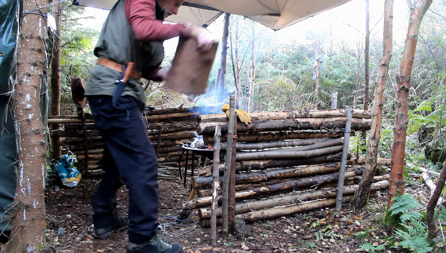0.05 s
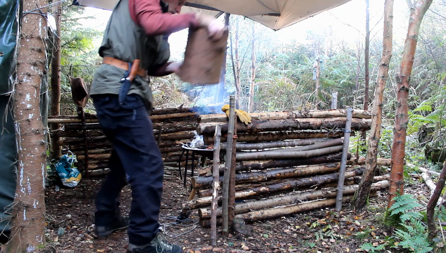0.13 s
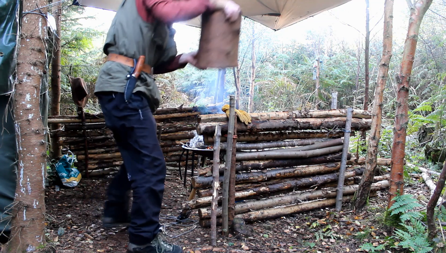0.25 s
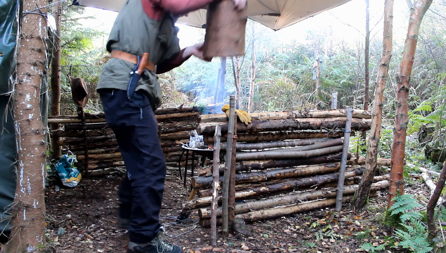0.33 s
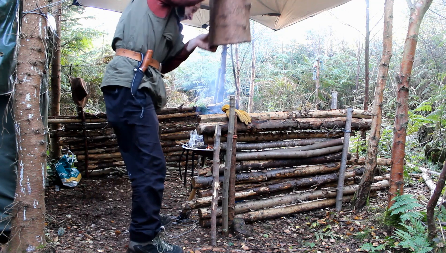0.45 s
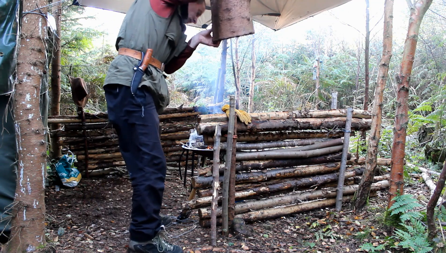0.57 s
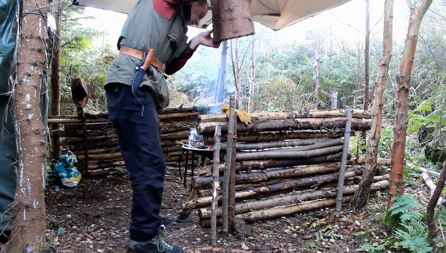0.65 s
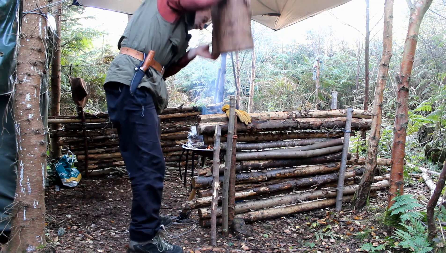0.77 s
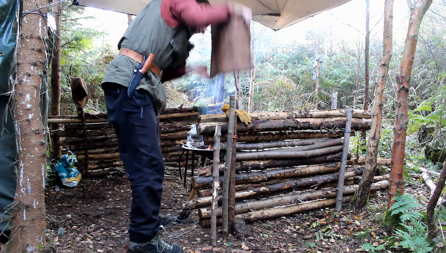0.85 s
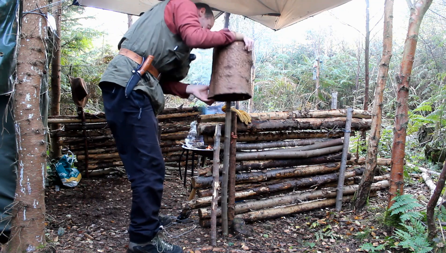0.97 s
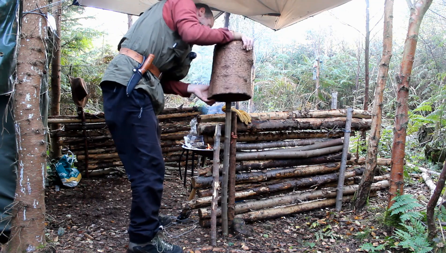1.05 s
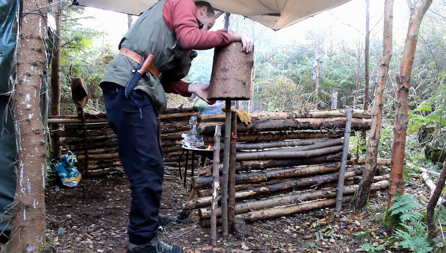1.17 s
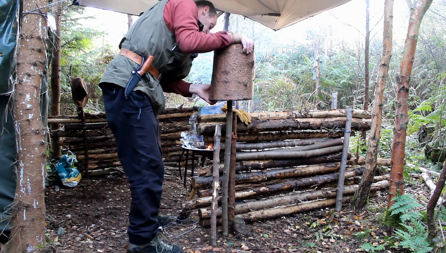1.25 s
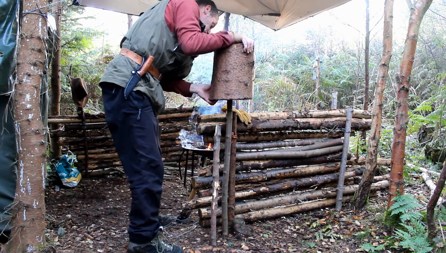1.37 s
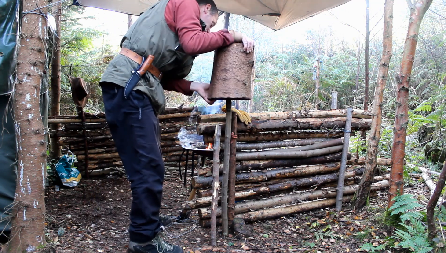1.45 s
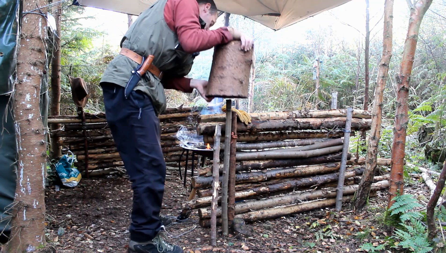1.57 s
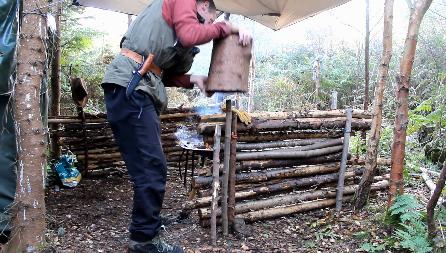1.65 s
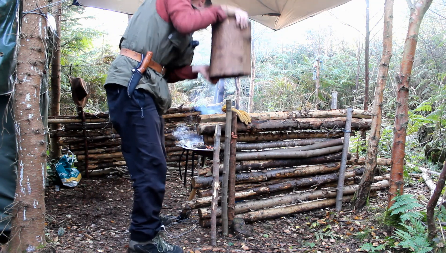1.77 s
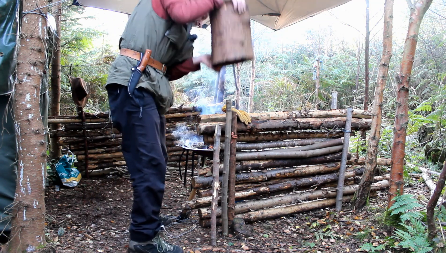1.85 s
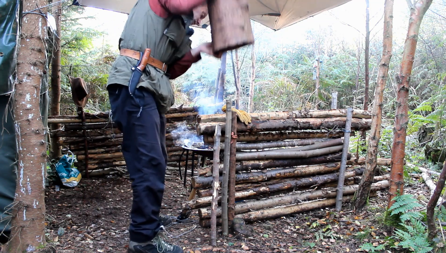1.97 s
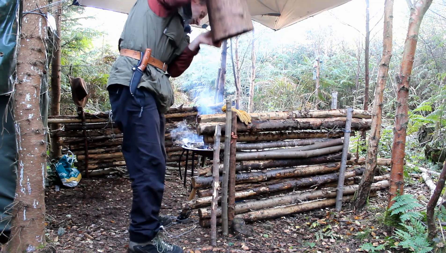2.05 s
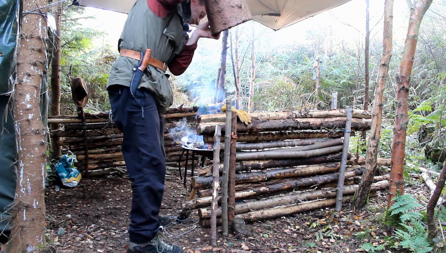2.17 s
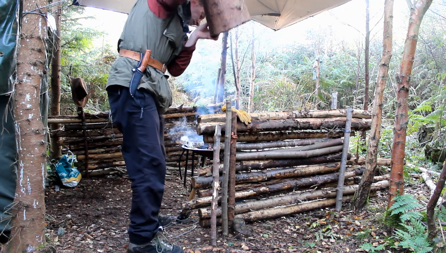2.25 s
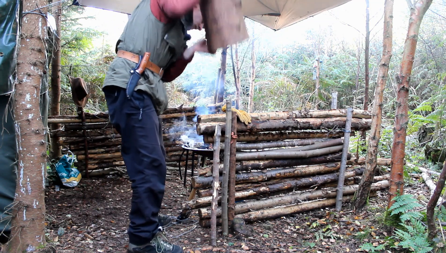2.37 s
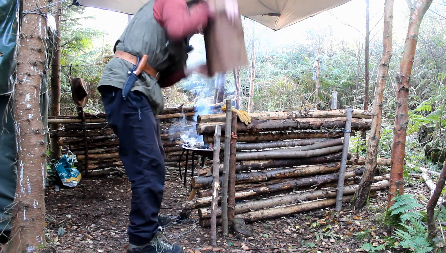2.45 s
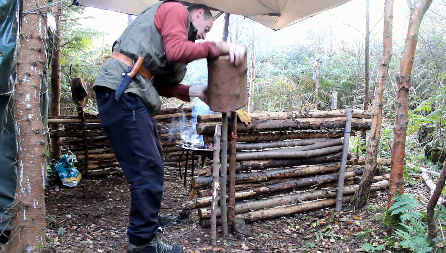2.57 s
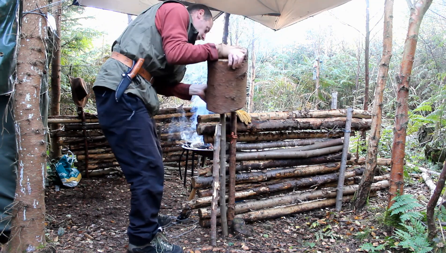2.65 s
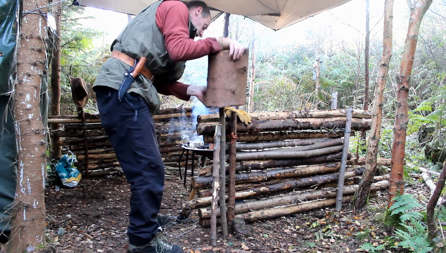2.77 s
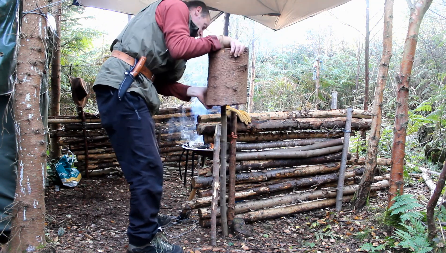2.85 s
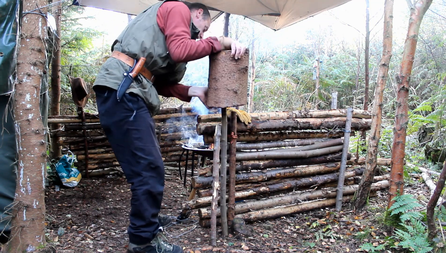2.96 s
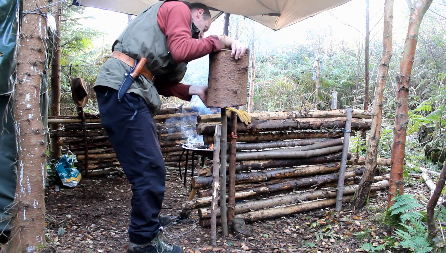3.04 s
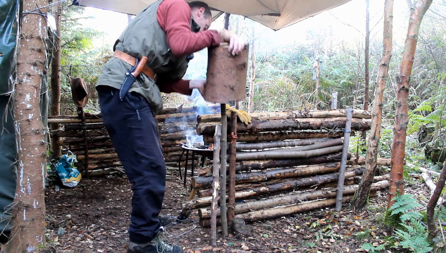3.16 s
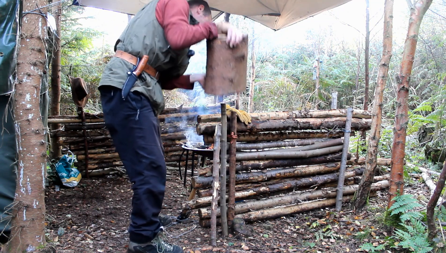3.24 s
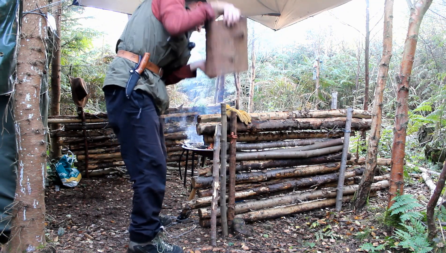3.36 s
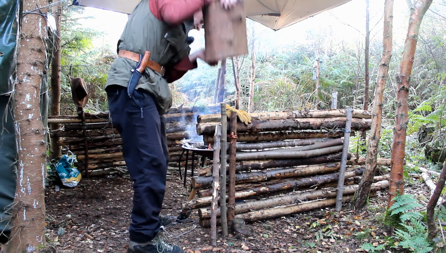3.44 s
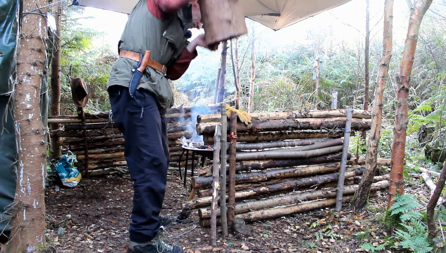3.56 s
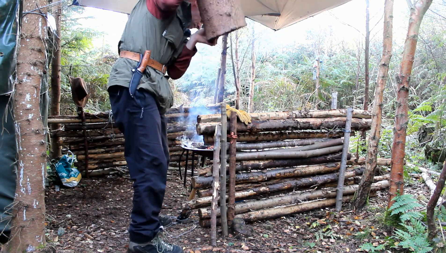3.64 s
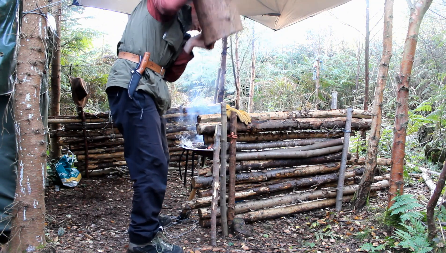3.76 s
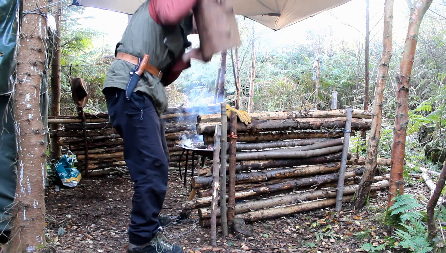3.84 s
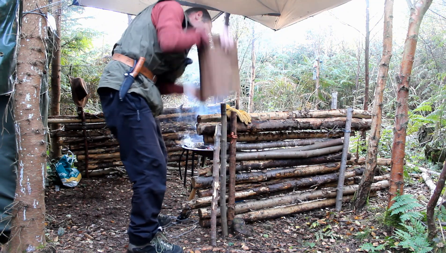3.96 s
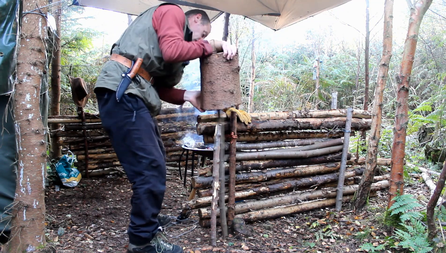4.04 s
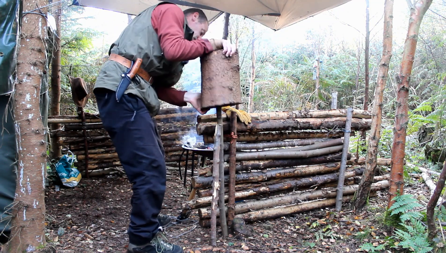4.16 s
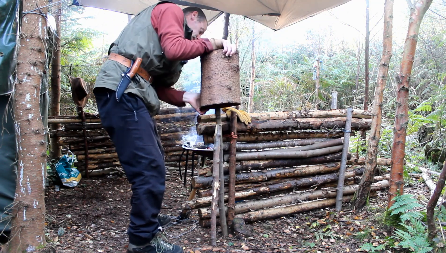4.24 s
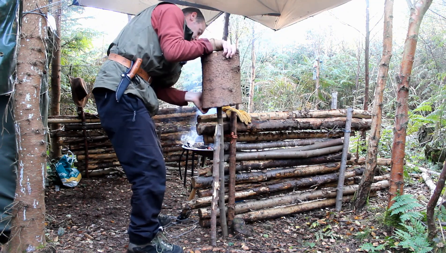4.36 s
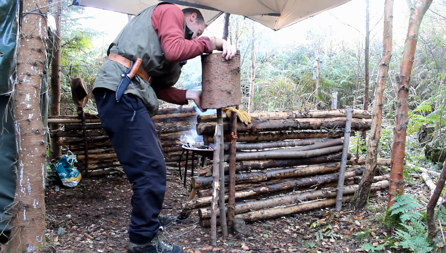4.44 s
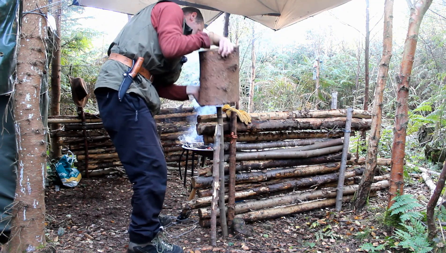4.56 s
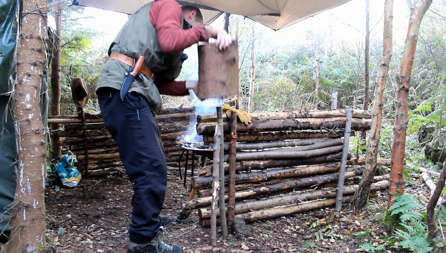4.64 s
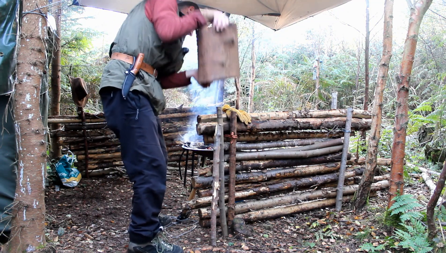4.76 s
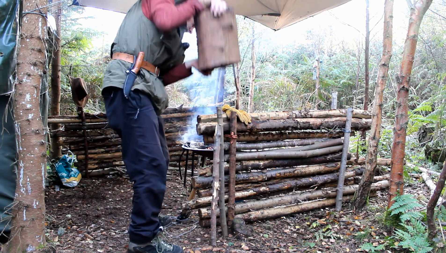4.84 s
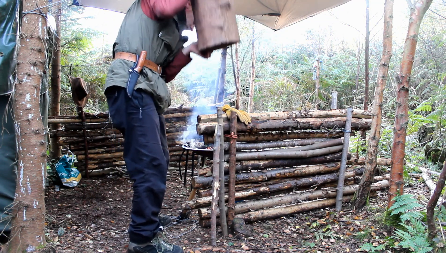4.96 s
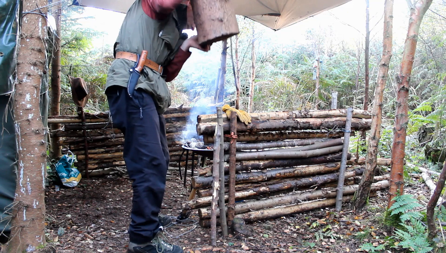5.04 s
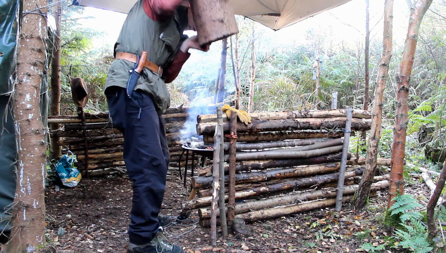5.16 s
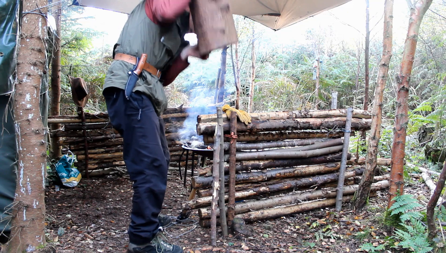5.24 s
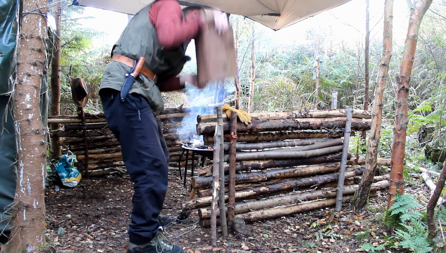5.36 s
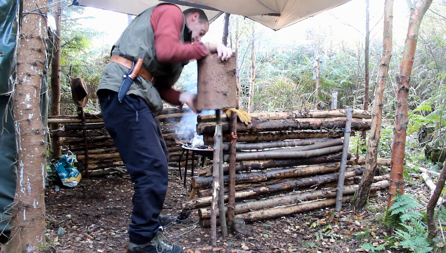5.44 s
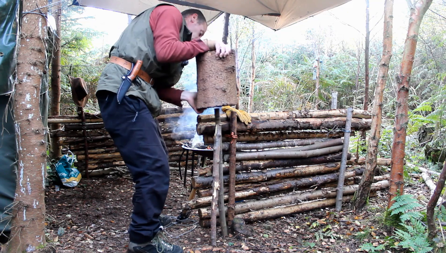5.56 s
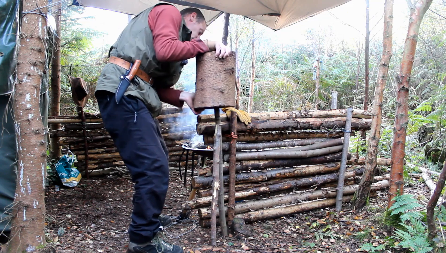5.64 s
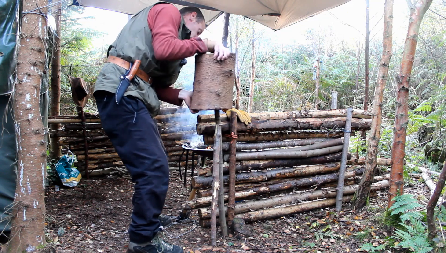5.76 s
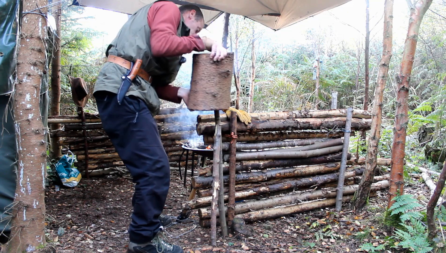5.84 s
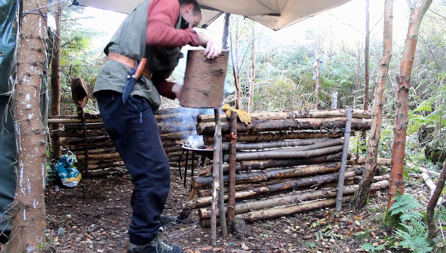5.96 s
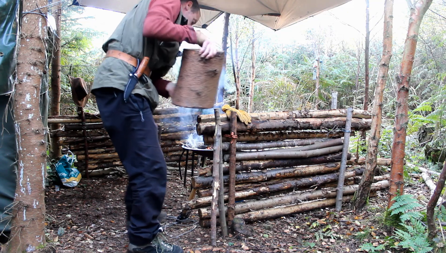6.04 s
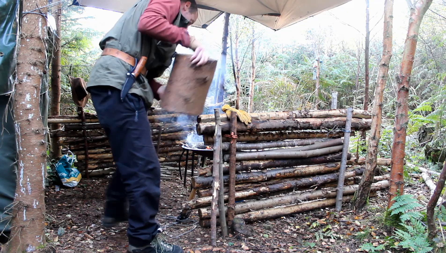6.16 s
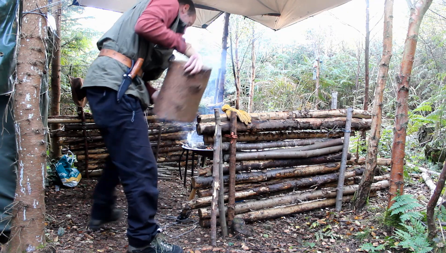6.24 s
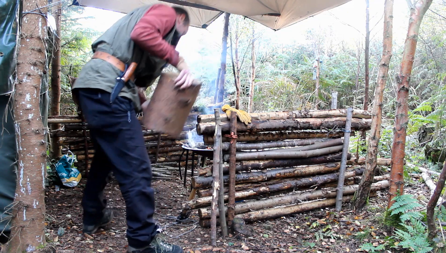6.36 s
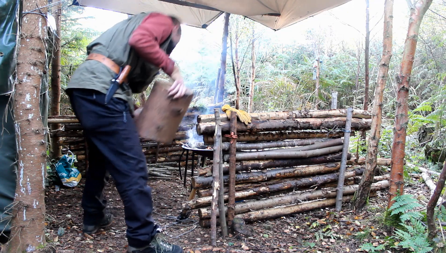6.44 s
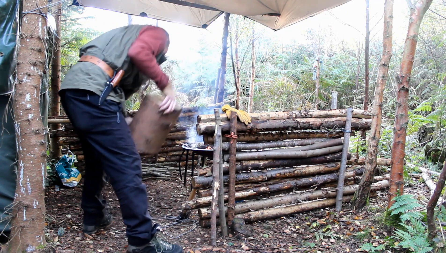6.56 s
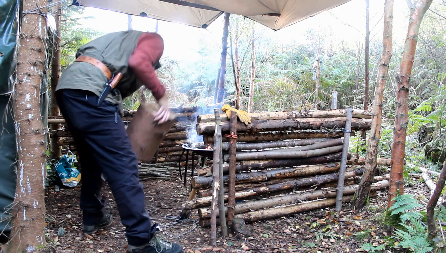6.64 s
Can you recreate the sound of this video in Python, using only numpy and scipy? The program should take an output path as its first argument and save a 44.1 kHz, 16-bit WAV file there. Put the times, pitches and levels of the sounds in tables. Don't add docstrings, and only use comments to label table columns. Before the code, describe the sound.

Four heavy log blows knock hard on a wooden stake, with cloth rustle, bark ticks and brief squeaks between them, over faint leaf hiss.

```python
import sys
import numpy as np
from scipy import signal
from scipy.io import wavfile

SR = 44100
rng = np.random.default_rng(int(sys.argv[2]) if len(sys.argv) > 2 else 0)


def to_linear_factor(level_db):
    exponent = np.asarray(level_db, float) / 20
    return 10 ** exponent


def inscribe(sig):
    pcm = np.round(np.clip(np.atleast_2d(sig).T, -1, 1) * 32767)
    wavfile.write(sys.argv[1], SR, pcm.astype(np.int16))


N = 295290

# freq_hz, density_db_per_hz
WOOD_SPECTRUM = [(15, -48), (25, -18), (59, -14.5), (140, -14.5), (178, -13), (221, -11.5), (340, -7),
                 (379, -5), (510, -4.5), (704, -2.5), (784, -0.5), (1500, -6.5), (2010, -11), (7520, -9),
                 (15600, -42.5)]
# time_s, level_db
BREEZE = [(0.0, -54.5), (0.56, -58.5), (2.46, -56.5), (3.04, -58), (3.8, -57), (4.6, -58), (5.5, -57.5),
          (6.7, -57)]
# freq_hz, density_db_per_hz
CLOTH_SPECTRUM = [(530, -22), (900, -5), (1260, -6.5), (2310, -4), (2930, -3.5), (4330, -4), (6980, 6),
                  (11100, -33), (15500, -30)]
# peak_s, level_db, dullness_db, swell_s, fade_s (swell and fade span 20 dB)
RUB_STROKES = [(0.031, -47, 8, 0.043, .05), (0.079, -43.5, -5, 0.0091, 0.024), (0.13, -61, 14, .05, 0.26),
               (0.366, -50.5, -17, 0.31, 0.57), (0.6, -56.5, -28, 0.56, 0.37), (1.326, -50, -7, .004, .025),
               (1.902, -54.5, -3, .037, 0.33), (2.136, -49, 7, 0.0099, 0.35), (2.34, -50, 21, 0.028, 0.027),
               (2.358, -45, 4, 0.018, 0.025), (2.55, -49.5, 3, 0.11, 0.0046),
               (2.862, -48, 21.5, 0.021, 0.012), (3.3, -52, -3, .004, .04), (3.685, -50.5, 4, .027, 0.15),
               (3.793, -41.5, 6, 0.033, 0.048), (4.02, -56.5, 13.5, 0.23, .004),
               (4.415, -57, 3, 0.081, 0.036), (5.06, -52, 3, .004, .01), (5.44, -53, 5, 0.23, .004),
               (6.02, -58.5, 7, 0.21, 0.16), (6.101, -59, 5, 0.015, .004), (6.426, -58, 10, 0.21, 0.11),
               (6.506, -58, 13, .012, 0.023)]
# time_s, pitch_hz, level_db
SQUEAKS = [
    [(.185, 2300, -56), (.195, 2500, -50), (.212, 3520, -54.5)],
    [(2.185, 1880, -66), (2.197, 1524, -50.5), (2.215, 1240, -53), (2.23, 1080, -56)],
    [(2.343, 2890, -60), (2.352, 3320, -50), (2.359, 3550, -40.5), (2.364, 3550, -53), (2.385, 3500, -61)],
]
SQUEAK_OCTAVES = [-22, -16, 10]
# start_s, peak_db, centre_hz
TWIG_TICKS = [(0.193, -44, 2450), (0.533, -30, 1500), (0.753, -43.5, 893), (0.871, -29, 1350),
              (1.569, -41, 1450), (2.195, -37, 1470), (2.344, -25, 3400), (2.52, -36, 1390),
              (2.6, -29, 1740), (2.621, -32.5, 1750), (2.849, -37, 1300), (2.86, -40, 1320),
              (3.439, -39, 1190), (3.519, -33.5, 1590), (3.532, -37, 930), (3.623, -31.5, 1250),
              (3.66, -33, 1320), (3.685, -40, 1630), (3.807, -34, 1280), (3.838, -29.5, 990),
              (4.087, -37, 3200), (4.904, -36, 920), (5.017, -38, 1330), (5.045, -30, 1330),
              (5.051, -26, 1050), (5.129, -39, 1340), (5.185, -41.5, 1080), (5.445, -27.5, 1490),
              (5.535, -38, 1960), (5.61, -36, 980)]
# start_s, peak_db, centre_hz
FIBRE_SNAPS = [(0.0444, -28, 5600), (0.0752, -25.5, 4600), (0.289, -37, 7130), (0.5318, -29, 3700),
               (0.5977, -37, 6700), (0.8829, -32, 7780), (1.0304, -49, 3900), (1.06, -29.5, 5540),
               (1.3029, -35, 6900), (1.3217, -28.5, 6730), (2.5698, -8.5, 3520), (2.8423, -30, 6620),
               (2.8543, -29, 4650), (2.9988, -31, 7600), (3.4533, -36, 6740), (3.58, -38, 664),
               (3.661, -40, 3000), (3.812, -28, 6300), (3.84, -40, 3000), (5.0296, -36, 3490),
               (5.4448, -32, 6900), (5.486, -21.5, 6910), (5.673, -33.5, 3180), (5.8654, -34, 7440),
               (6.4212, -32, 7040)]
# start_s, peak_db, centre_hz, t60_s, snap_db
CORD_CRACKS = [(2.3340, -32, 480, 0.031, -9), (2.34, -26, 3320, 0.0042, 12),
               (2.345, -29.5, 526, 0.032, -18), (2.5654, -17, 5480, 0.013, 9.5),
               (2.6020, -27.5, 4960, 0.05, -6), (2.611, -37, 4000, .03, -6),
               (3.294, -29.5, 7000, 0.022, 7.5), (5.018, -38, 3420, 0.013, 11.5),
               (5.0520, -33, 610, 0.033, -1)]
# t60_s, width_octaves at -36 dB, widening_octaves_per_db, snap_db
TWIG_RESONANCE = (.013, 1.2, .04, -3)
FIBRE_RESONANCE = (.013, 1.2, .015, -3)
# freq_hz, level_db, t60_s
GROUND_MODES = [(91.6, -42, 0.35), (120, -26.5, 0.2), (158, -8, 0.045), (210.6, -13, 0.085)]
# freq_hz, level_db, t60_s
BODY_MODES = [(337, -2.5, 0.041), (462, -17.5, 0.029), (585, -12, 0.035), (702, -7, 0.039)]
# freq_hz, level_db, t60_s
COUPLED_MODES = [(601, 1, 0.016)]
# freq_hz, level_db, t60_s
UPPER_MODES = [(1120, -7.5, 0.025), (1314, -11, 0.041), (1487, -10, 0.019), (1725, -9.5, 0.014),
               (2115, -13, 0.029), (2644, -13, 0.011), (3490, -7.5, 0.0078), (4820, -13.5, 0.0066)]
# centre_hz, level_db, t60_s
BARK_BANDS = [(2500, 3, 0.017), (4640, 3.5, 0.009), (8400, -34, 0.004), (752, 1, 0.069), (1340, 1.5, 0.081),
              (3000, 0, 0.079), (4630, -7, 0.1), (6320, -7, 0.088), (11500, -3, 0.043)]
# start_s, force_db, pitch_ratio, thud_db, upper_db
BLOWS = [
    (0.9937, -11, 0.95, -4.5, 4),
    (2.5602, -14.5, 0.85, 3, -1.5),
    (4.0323, -8, 1.015, -3, -4),
    (5.4785, -8, 1.1, -1, -3.5),
]
# start_s, force_db, pitch_ratio, upper_db, crack_db
GLANCES = [
    (0.9930, -25, 1.26, 2.5, 5),
    (2.3420, -39, 1, -3, 4),
    (2.5586, -28.5, 1.21, 4, -1),
    (2.5660, -30, 0.81, 4, 10),
    (4.019, -41, 1.43, 8.5, 1),
    (4.0318, -25.5, 1.62, 4, -0.5),
    (5.4773, -23, 2, -5, 2.5),
]
# start_s, force_db, pitch_ratio, thud_db, upper_db
BOUNCES = [
    (0.0215, -30, 0.39, 0, -27),
    (0.982, -49.5, 1.2, -9, 12),
    (1.034, -48, 1.2, 2, 15.5),
    (1.061, -45, 0.69, 12, 7),
    (2.862, -57.5, .7, 18, 5),
    (4.1310, -36.5, 0.78, 2, -2.5),
    (4.1383, -46, 0.66, 16, -2),
    (5.6581, -37.5, 0.89, 12.5, 7),
    (5.674, -43.5, 1.1, 15, 5),
]
# start_s, thud_db
SHUDDERS = [
    (1.0900, -53),
    (2.607, -32.5),
    (5.701, -41),
]
# delay_s, level_db
ECHOES = [
    (.0021, -15.5),
    (.0075, -35.5),
    (.019, -27),
    (.041, -37),
]


def rms_one(x):
    return x / np.sqrt(np.mean(x ** 2) + 1e-20)


def drift(rate_hz):
    pole = np.exp(-80 * np.pi * rate_hz / SR)
    noise = rng.standard_normal(N // 40 + 2002)
    slow = signal.lfilter([1], [1, -2 * pole, pole ** 2], noise)[2000:]
    return np.interp(np.arange(N) / 40, np.arange(len(slow)), rms_one(slow))


def band(x, centre_hz, octaves):
    edges_hz = centre_hz * 2. ** (np.array([-.5, .5]) * octaves)
    edges_hz = np.clip(edges_hz, 10, .45 * SR)
    return signal.sosfilt(signal.butter(2, edges_hz, "band", fs=SR, output="sos"), x)


def coloured(source, spectrum, flicker_db):
    out = 0
    freq_hz, density_db = np.transpose(spectrum)
    for k, centre_hz in enumerate(28 * 2 ** np.arange(0, 9.3, 1 / 3)):
        gain_db = np.interp(np.log(centre_hz), np.log(freq_hz), density_db, left=-90)
        gain = to_linear_factor(gain_db + flicker_db * drift(16.4))
        out = out + gain * band(source[k % 2], centre_hz, 1 / 3)
    return rms_one(out)


def add(out, start_s, sound):
    i = round(start_s * SR)
    out[i:i + len(sound)] += sound[:N - i]


def background():
    time_s, level_db = np.transpose(BREEZE)
    air = coloured(rng.standard_normal((2, N)), WOOD_SPECTRUM, flicker_db=0.89)
    return to_linear_factor(np.interp(np.arange(N) / SR, time_s, level_db) + 3.5) * air


def strokes():
    t = np.arange(N) / SR
    level, weighted_db = np.full(N, 1e-9), np.zeros(N)
    for peak_s, level_db, dull_db, swell_s, fade_s in RUB_STROKES:
        before = (peak_s - t) / max(swell_s, .002)
        after = (t - peak_s) / max(fade_s, .002)
        gain = to_linear_factor(level_db - 20 * np.where(t < peak_s, before, after))
        level = level + gain
        weighted_db = weighted_db + gain * dull_db
    return level, to_linear_factor(weighted_db / level)


def rustle(grain_db):
    level, dull = strokes()
    grain = to_linear_factor(grain_db * np.minimum(rng.exponential(1, (2, N)), 4))
    slips = rng.standard_normal((2, N)) * grain
    coarse = slips[0, ::-1] * to_linear_factor(5.3 * drift(250))
    drag = rms_one(band(band(coarse, 2450, 2.5), 1840, 2.8))
    hiss = rms_one(band(slips[1, ::-1], 8400, 0.59))
    cloth = coloured(slips, CLOTH_SPECTRUM, flicker_db=1.5)
    return level * (cloth + to_linear_factor(-11.5) * dull * drag + to_linear_factor(-22.0) / (dull + 0.087) * hiss)


def squeaks(wobble):
    out, t = 0, np.arange(N) / SR
    shake = 1 + wobble * drift(150)
    for rows, octave_db in zip(SQUEAKS, SQUEAK_OCTAVES):
        time_s, pitch_hz, level_db = np.transpose(rows)
        phase = 2 * np.pi * np.cumsum(np.interp(t, time_s, pitch_hz) * shake) / SR
        level = to_linear_factor(np.interp(t, time_s, level_db, left=-120, right=-120))
        out = out + level * (np.sin(phase) + to_linear_factor(octave_db) * np.sin(2 * phase))
    return out


def small_parts():
    rows = []
    for start_s, peak_db, hz, t60_s, snap_db in CORD_CRACKS:
        rows.append((start_s, peak_db, hz, t60_s, 1.23 + 0.04 * hz / 1000, snap_db))
    for table, resonance in ((TWIG_TICKS, TWIG_RESONANCE), (FIBRE_SNAPS, FIBRE_RESONANCE)):
        t60_s, octaves, octaves_per_db, snap_db = resonance
        for start_s, peak_db, hz in table:
            rows.append((start_s, peak_db, hz, t60_s, octaves + octaves_per_db * (peak_db + 36), snap_db))
    return rows


def ticks():
    out, t = np.zeros(N), np.arange(SR // 10) / SR
    for start_s, peak_db, hz, t60_s, octaves, snap_db in small_parts():
        noise = rng.standard_normal(len(t)) * to_linear_factor(-60 * t / max(t60_s, .002))
        burst = band(noise, hz, max(octaves, .2))
        snap = band((t == 0) + 1e-18, hz, 2.17)
        tick = burst / np.abs(burst).max() - to_linear_factor(snap_db) * snap / snap.max()
        add(out, start_s, to_linear_factor(peak_db - 5.5) * tick)
    return out


def contacts():
    blow_bark_db, bounce_bark_db, glance_thud_db, shudder_wood_db = -23.5, -50, -28, -22
    rows = [row + (blow_bark_db - row[1],) for row in BLOWS]
    rows += [row + (bounce_bark_db - row[1],) for row in BOUNCES]
    for start_s, force_db, ratio, upper_db, crack_db in GLANCES:
        rows.append((start_s, force_db, ratio, glance_thud_db, upper_db, crack_db))
    for start_s, thud_db in SHUDDERS:
        rows.append((start_s, thud_db + shudder_wood_db, .85, -shudder_wood_db, -9, -15))
    return rows


def ring(force, modes, ratio, sign=1):
    out = 0
    for k, (hz, level_db, t60_s) in enumerate(modes):
        r = to_linear_factor(-60 / (t60_s * SR))
        w = 2 * np.pi * hz * ratio / SR
        mode = signal.lfilter([0, np.sin(w)], [1, -2 * r * np.cos(w), r * r], force)
        out = out + sign ** k * to_linear_factor(level_db) * mode
    return out


def bark_crack(t, grit_db):
    grit = rng.standard_normal(len(t)) * to_linear_factor(grit_db * np.minimum(rng.exponential(1, len(t)), 4))
    out = 0
    for hz, level_db, t60_s in BARK_BANDS:
        out = out + rms_one(band(grit, hz, 1) * 1.0) * to_linear_factor(level_db - 60 * t / t60_s)
    return out


def knocks(contact_s, grit_db):
    out, t = np.zeros(N), np.arange(SR // 3) / SR
    force = np.sin(np.pi * np.minimum(t / contact_s, 1))
    force = force / force.sum() + 1e-18
    settle = to_linear_factor(-9 / (1 + np.exp(-np.minimum((t - .0058) / 0.00078, 30))))
    edge = (t == 0) + 1e-18
    for start_s, force_db, ratio, thud_db, upper_db, crack_db in contacts():
        crack = bark_crack(t, grit_db)
        top_hz = min(9000 * to_linear_factor(0.46 * (force_db + 22.0)), 15000)
        hard = signal.sosfilt(signal.butter(2, top_hz, fs=SR, output="sos"), edge)
        wood = -ring(force, BODY_MODES, ratio)
        wood += to_linear_factor(-26.5) * ring(ring(force, COUPLED_MODES, ratio), COUPLED_MODES, ratio)
        wood = settle * wood + to_linear_factor(upper_db) * ring(hard, UPPER_MODES, 0.99, sign=-1.0)
        thud = to_linear_factor(thud_db) * ring(force, GROUND_MODES, 0.95)
        add(out, start_s, to_linear_factor(force_db) * (wood - thud + to_linear_factor(crack_db - 9) * crack))
    return out


def clearing(x):
    x = signal.sosfilt(signal.butter(6, 90, "high", fs=SR, output="sos"), x)
    x = signal.sosfilt(signal.butter(4, 9000, fs=SR, output="sos"), x)
    dull = signal.sosfilt(signal.butter(1, 3500, fs=SR, output="sos"), x)
    out = x.copy()
    for delay_s, level_db in ECHOES:
        add(out, delay_s, to_linear_factor(level_db) * dull)
    return out


def scene():
    near = squeaks(wobble=.025) + ticks() + knocks(contact_s=0.00078, grit_db=5.0)
    mono = background() + rustle(grain_db=3.5) + clearing(near)
    return np.array([mono, mono])


def band_limit(x):
    return signal.sosfilt(signal.butter(12, 15710, fs=SR, output="sos"), x)


def record(dry):
    mix = signal.sosfilt(signal.cheby2(10, 50, 16300, fs=SR, output="sos"), dry)
    return band_limit(mix)


dry = scene()
out = record(dry)
inscribe(out)
```